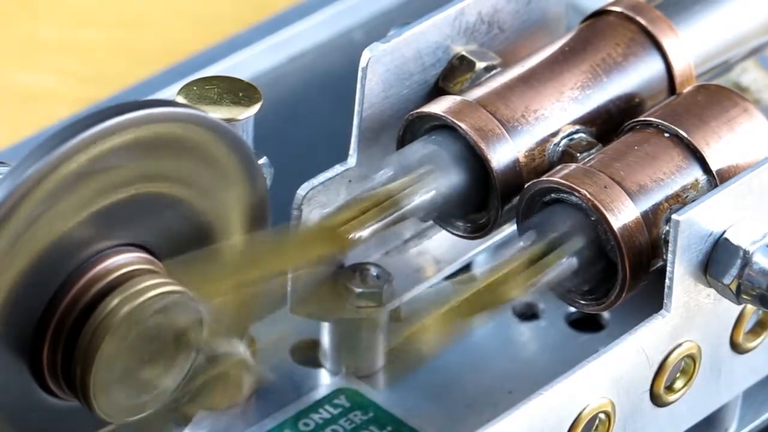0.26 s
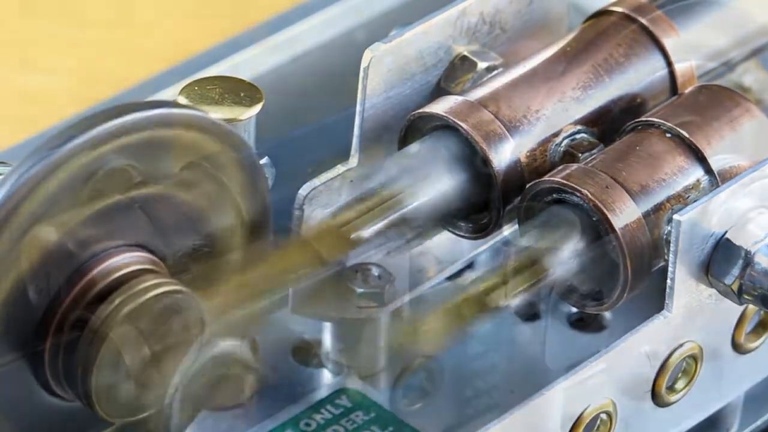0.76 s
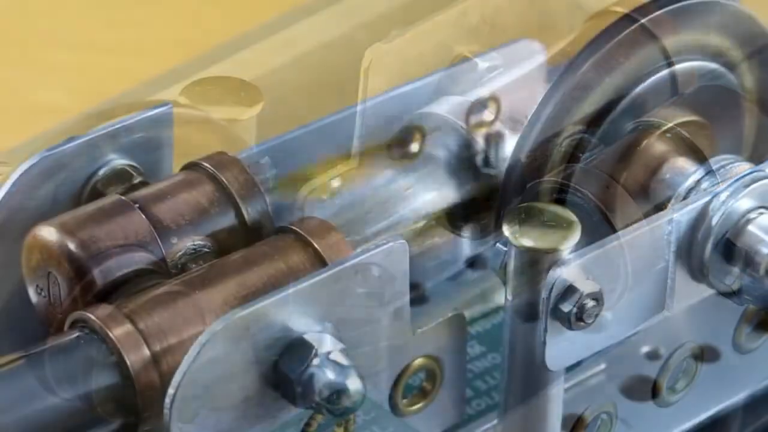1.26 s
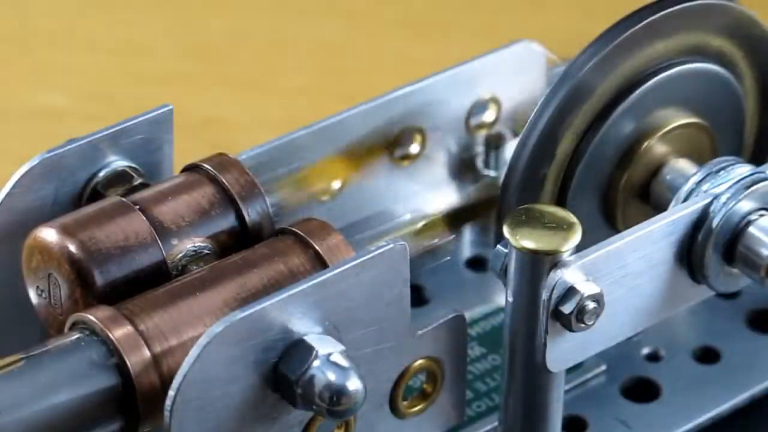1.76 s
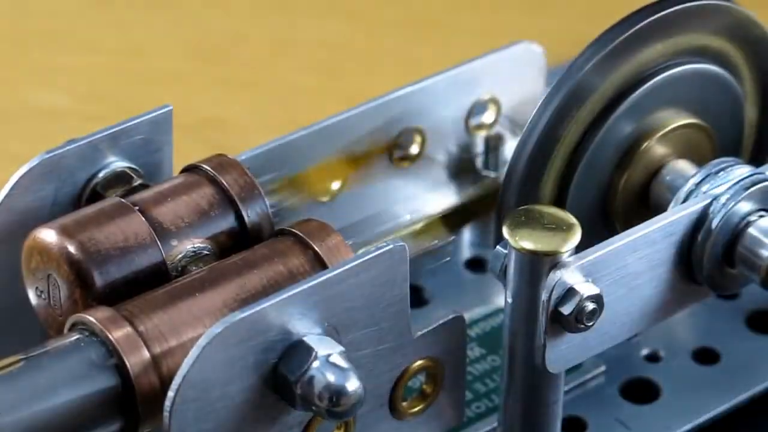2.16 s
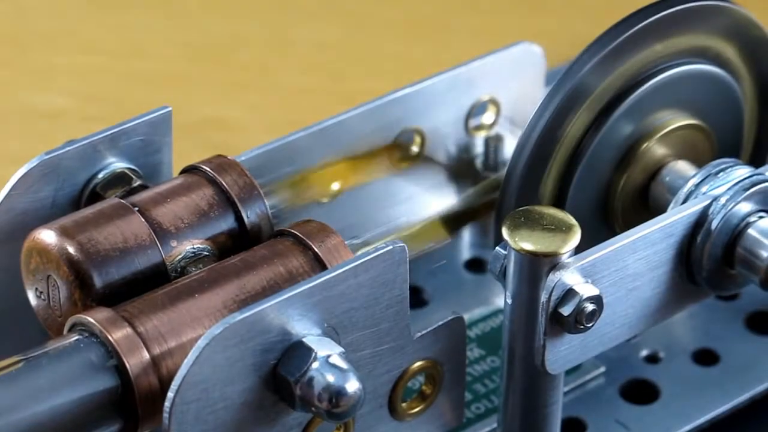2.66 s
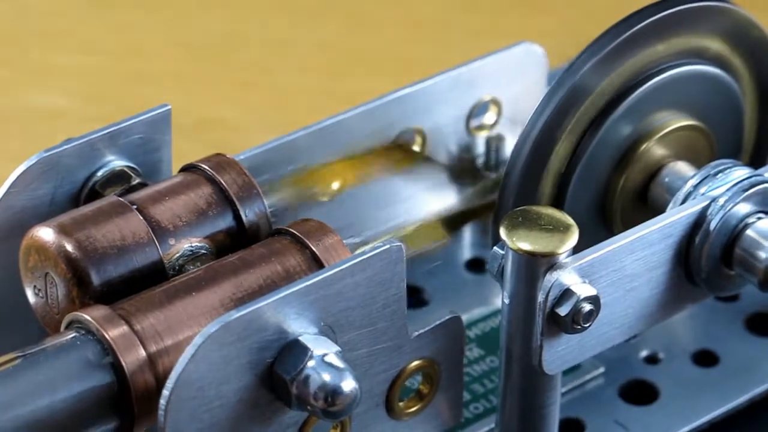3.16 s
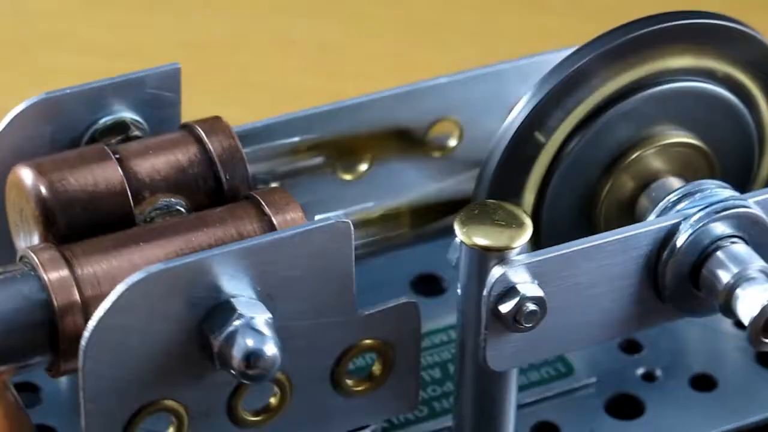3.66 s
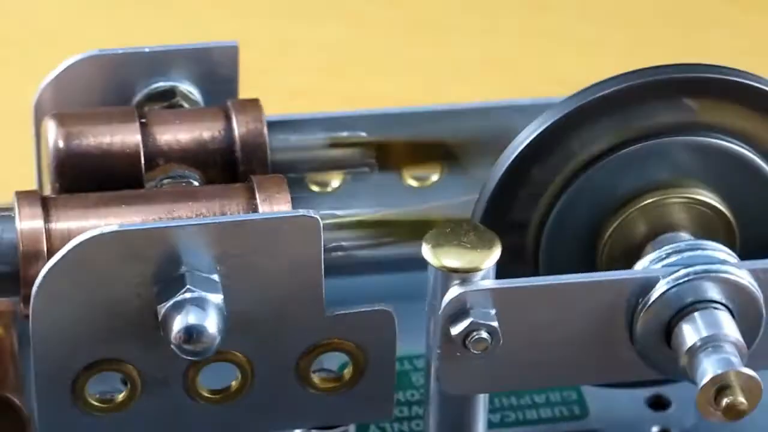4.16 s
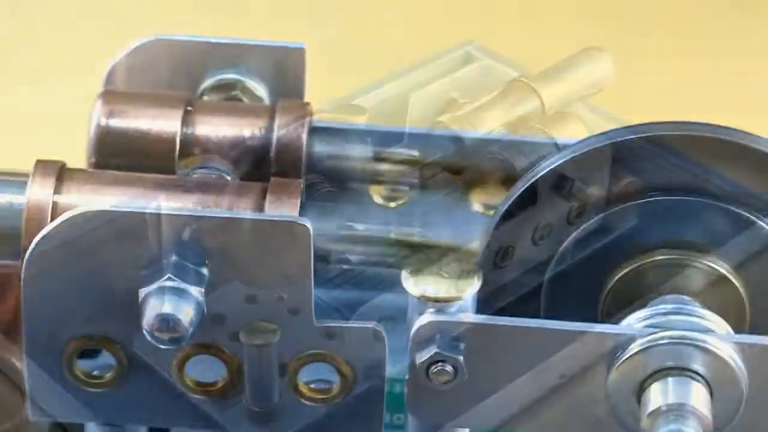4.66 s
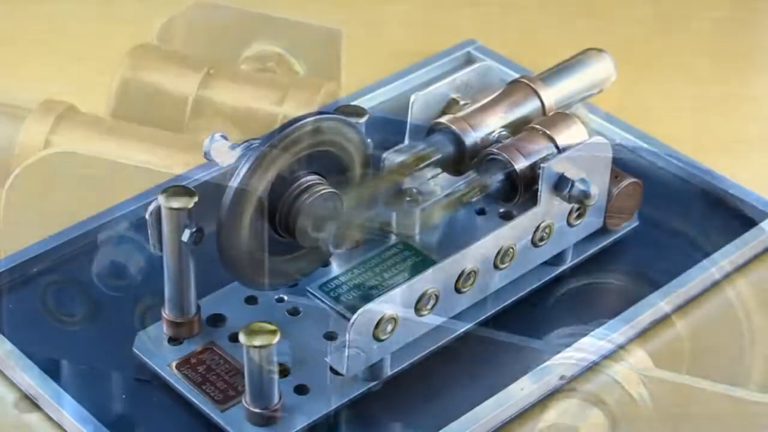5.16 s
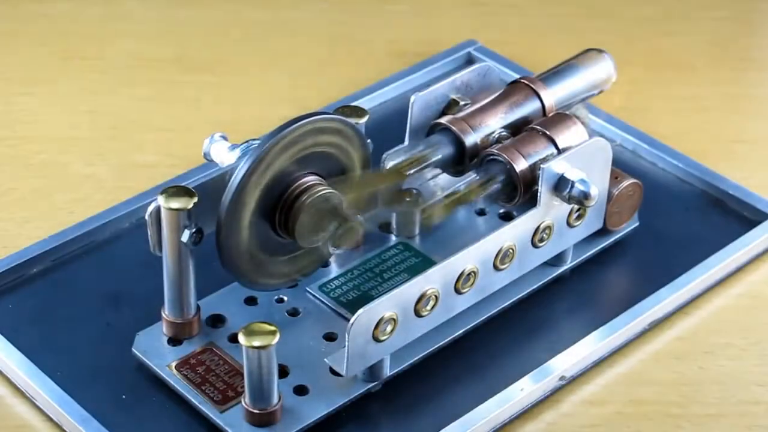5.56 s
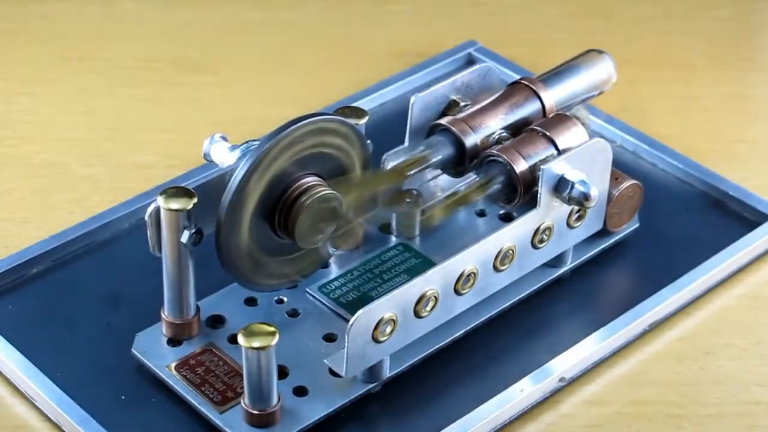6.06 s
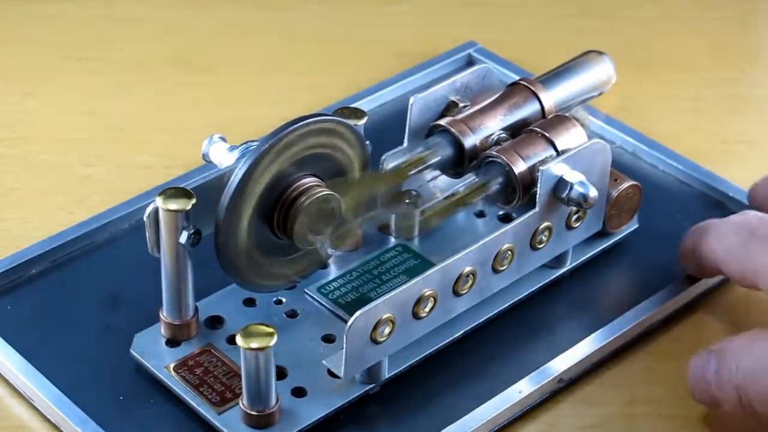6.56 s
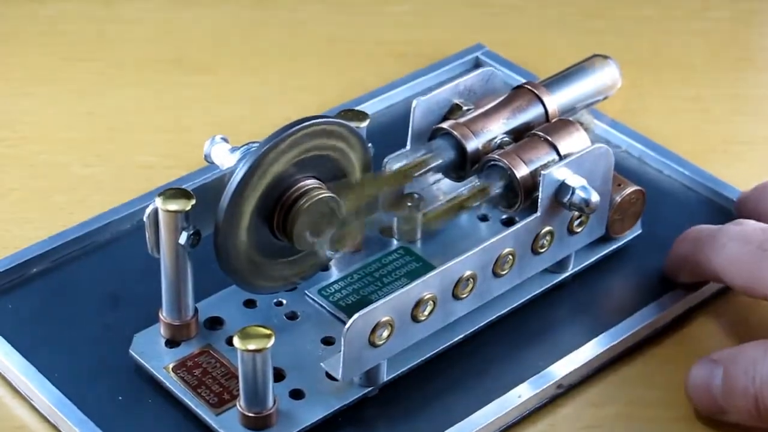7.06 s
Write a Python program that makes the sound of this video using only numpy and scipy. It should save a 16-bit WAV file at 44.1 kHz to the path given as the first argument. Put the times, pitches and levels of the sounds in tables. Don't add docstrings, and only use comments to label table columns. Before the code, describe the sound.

Close stereo sound of a tiny metal engine at steady high speed: rapid three-part clicking each turn, thin metal ringing, dry rubbing and a droning vibration through the table. Three joined stretches differ in pitch and tone: fast and tinny, slightly slower with a stronger hum, then fast and unsteady. Treble leans right, the left side duller. Faint room rumble; the engine never stops.

```python
import sys
import numpy as np
from scipy import signal
from scipy.fft import rfft, irfft, next_fast_len
from scipy.io import wavfile
from scipy.ndimage import uniform_filter1d

SR = 44100
rng = np.random.default_rng(int(sys.argv[2]) if len(sys.argv) > 2 else 0)


def digitize_waveform(pressure):
    field = np.atleast_2d(pressure).T
    bounded = np.clip(field, -1, 1)
    quanta = np.round(bounded * 32767).astype(np.int16)
    wavfile.write(sys.argv[1], SR, quanta)


def to_linear_factor(level_db):
    exponent = np.asarray(level_db, float) / 20
    return 10 ** exponent


N = 322812

LANDING = [
    [(1.5, 0.064, .02), (2.6, 0.048, -0.1615), (.5, .07, 0.012)],
    [(1.0, 0.12, .15), (1.5, 0.11, -0.1006), (1.5, 0.06, -0.0087)],
    [(2.2, 0.078, .06), (1.4, 0.071, -0.0785), (1, 0.1, .01)],
    [(0.9, 0.093, .2), (2.2, 0.084, 0.13), (.6, 0.057, -0.067)],
]


def unit(x):
    return x / np.sqrt(np.mean(x ** 2))


def ring(x, hz, width_hz):
    return signal.lfilter(*signal.iirpeak(hz, hz / width_hz, SR), x) * np.sqrt(SR / np.pi / width_hz)


def highpass(x, order, hz):
    return signal.sosfilt(signal.butter(order, hz, "high", fs=SR, output="sos"), x)


def walk(size, rate):
    spacing, step = int(SR / rate), 16
    points = rng.standard_normal(size // spacing + 2)
    levels = np.interp(np.arange(0, size, step) / spacing, np.arange(len(points)), points)
    return 0.45 * np.repeat(uniform_filter1d(levels, spacing // step), step)[:size]


def chatter(size):
    hits, count = np.zeros(size), int(size * 12000 / SR)
    force_db = rng.exponential(size=count)
    hits[rng.integers(size, size=count)] = rng.standard_normal(count) * to_linear_factor(force_db)
    return unit(hits)


def knock(turns, start, length, blow, rise):
    count = (turns - start + .1).astype(int)
    since = (turns - start - .007 * rng.standard_normal(200)[count]) % 1
    struck = np.diff(since > .08, prepend=True) & (since > .08)
    firm = 3 * uniform_filter1d(blow * struck, size=3)
    shape = (1 - np.exp(-(since / rise) ** 2)) * np.exp(-(since / length) ** 2)
    force_db = .8 * rng.standard_normal(200)[count]
    loose, repeat = chatter(len(turns)), 0.71
    worn = loose[(since / np.median(np.diff(turns))).astype(int)]
    return to_linear_factor(force_db) * (firm + shape * (np.sqrt(repeat) * worn + np.sqrt(1 - repeat) * loose))


def hard_knocks_db(t):
    # (t/s, peak level/dB)
    hard = np.array([(0.0478, -9), (0.0767, -10), (0.1062, -7), (0.3376, -9), (0.4249, -8), (0.5402, -5.5),
                     (0.598, -11.5), (0.6265, -10), (0.6559, -9), (0.6843, -13), (0.829, -9.5),
                     (0.9158, -5), (0.9742, -14), (1.003, -7), (1.0316, -10), (1.1478, -12), (1.2052, -10),
                     (1.2925, -18), (1.3498, -10), (1.4077, -6), (1.4656, -11), (1.5229, -15),
                     (2.2024, -12), (2.8396, -9), (7.1693, -4.5), (7.257, -8)])
    middling_db, length_s = 3.5, 0.0033
    extra_db = np.zeros(len(t))
    for s, db in hard:
        near = slice(*np.searchsorted(t, (s - 2 * length_s, s + 4 * length_s)))
        over_db = max(db - np.median(hard[:, 1]) + middling_db, 0)
        extra_db[near] += over_db * np.exp(-((t[near] - s) / length_s - 1) ** 2)
    return extra_db


def contacts(t, turns, place):
    knocks = [
        [(.96, .11), (.385, .095), (.6, .15)],
        [(.05, .26), (.54, .24), (.76, .2)],
        [(.05, .3), (.55, .2), (.76, .26)],
        [(.96, .16), (.42, .16), (.55, .13)],
    ][place]
    extra_db = hard_knocks_db(t)
    bursts = [to_linear_factor(extra_db) * knock(turns + 1, start, length, blow, rise)
              for (start, length), (blow, rise, _) in zip(knocks, LANDING[place])]
    dip, dip_turns = (0.35, 0.35, 0.5, 0.33)[place], 0.14
    ease = 1
    for start, _ in knocks[:2]:
        away = (turns - start + 0.53) % 1 - .5
        ease = ease * (1 - dip * np.exp(-(away / dip_turns) ** 2))
    return np.array(bursts + [ease * chatter(len(turns))])


def swell(t, hz):
    # (centre t/s, half length/s, f/Hz, level/dB)
    swells = [
        (4.25, 0.2, 1240, 3),
        (5.15, .45, 4270, 4.5),
        (6.14, .12, 4200, 4.5),
        (6.287, 0.11, 3620, 5),
    ]
    return to_linear_factor(sum(db * np.exp(-((t - s) / half) ** 2)
                   for s, half, near_hz, db in swells if abs(hz / near_hz - 1) < .06))


def frame_ring(t, turns, place, cylinders):
    # (f/Hz, width/Hz, level/dB in knock 1, knock 2, knock 3, steady rub)
    frame_near = [(1273, 56, -47, -46, -38, -37), (2105, 48, -34, -62, -61, -38.5),
                  (2460, 440, -47, -64.5, -49.0, -35.5), (3390, 250, -53, -20, -43, -34.5),
                  (3908, 350, -39, -15, -36, -33.5), (4810, 410, -11.5, -21, -31, -47),
                  (5260, 450, -25, -45, -50, -28), (5580, 150, -30, -28, -50, -58),
                  (6070, 370, -37, -53, -42, -35), (6920, 470, -18, -23, -37, -25.5),
                  (7290, 75, -17, -32, -47.5, -26), (7940, 190, -18, -15.5, -38, -38),
                  (8590, 420, -12, -44, -27, -28), (9320, 110, -16.5, -19, -47, -44)]
    frame_side = [(1240, 110, -50, -33, -35, -37), (2070, 53, -56, -71, -55.3, -39),
                  (2474, 100, -34, -27.5, -52, -30.5), (2720, 55, -62, -23, -56.5, -47),
                  (3286, 210, -63, -19, -55, -31.5), (3825, 87, -51, -32.5, -38, -41),
                  (4184, 86, -39, -20, -57, -32.5), (4983, 540, -17, -25.5, -45, -27),
                  (5920, 390, -43, -33, -50.8, -41), (6380, 500, -38.5, -52, -27, -28.5),
                  (6750, 77, -19, -45.5, -46, -29.5), (7430, 300, -17, -15, -15, -23.5),
                  (8180, 190, -17.5, -44, -13, -30), (9540, 350, -19, -36, -30, -33)]
    frame_back = [(1239, 32, -50, -57, -33, -34.5), (2013, 86, -30.5, -50, -44, -36.5),
                  (2458, 81, -38, -26.5, -41, -32.5), (2720, 120, -54, -23, -50, -35),
                  (3276, 180, -38, -22, -54.5, -26.5), (3460, 210, -53, -22, -53, -33),
                  (4274, 130, -24, -20.5, -71, -30.5), (5190, 250, -27, -24, -47, -27.5),
                  (5890, 120, -46, -32, -38, -40), (7140, 610, -18, -42, -17, -24),
                  (7400, 280, -15.5, -45, -15.5, -23.5), (8250, 360, -18, -20, -34, -30),
                  (8120, 200, -28, -50.6, -23, -31), (9454, 400, -15, -31, -20.5, -33)]
    frame_far = [(1309, 63, -59, -43, -46, -38), (1760, 44, -31.5, -55, -56, -47.5),
                 (2063, 55, -35, -50, -69, -42.5), (2710, 340, -66, -61, -57, -39),
                 (3630, 120, -48, -23, -25, -36.5), (4236, 540, -18.5, -21.5, -23, -38),
                 (4580, 52, -26, -25, -46, -36), (5050, 300, -21, -34, -36, -37.5),
                 (5590, 69, -39, -30.5, -43.9, -58), (6330, 83, -17, -48.3, -48.3, -34),
                 (7280, 280, -20, -44, -25, -23.5), (8140, 770, -12.5, -55, -33, -69),
                 (8250, 220, -35, -24, -20, -30), (9430, 430, -17.5, -24.5, -41, -34.5)]
    frame = (frame_near, frame_side, frame_back, frame_far)[place]
    samples_per_turn = SR * (t[-1] - t[0]) / (turns[-1] - turns[0])
    glide = [row[2] * samples_per_turn for row in LANDING[place]] + [0]
    stiff_hz = 2730
    lower, upper = np.zeros(len(t)), np.zeros(len(t))
    for k, (hz, width_hz, *share_db) in enumerate(frame):
        wander_db = 0.5 * rng.standard_normal(200) + 1.2 * uniform_filter1d(rng.standard_normal(200), size=4)
        octaves = np.log2(np.clip(hz, 3000, 5300) / 4200) * (hz < 1.1 * 5300)
        drive = sum(to_linear_factor(db) * np.roll(c, int(g * octaves))
                    for db, c, g in zip(share_db, cylinders[k % 2], glide))
        drive = drive * to_linear_factor(wander_db)[turns.astype(int)] * swell(t, hz)
        group = upper if hz > stiff_hz else lower
        group += (-1) ** (k // 2) * ring(drive, hz, width_hz)
    return lower + highpass(upper, 3, stiff_hz)


def plate_ring(t, turns, place):
    # (f/Hz, width/Hz, level/dB)
    plate = [
        [(730, 50, -53), (1099, 70, -46.5), (1237, 44, -35), (1817, 34, -45.5)],
        [(780, 230, -48), (1069, 82, -41.5), (1413, 210, -44.5), (1417, 41, -41.5)],
        [(717, 68, -43.5), (980, 150, -43), (1258, 39, -40.5), (1456, 65, -47)],
        [(687, 31, -50), (1027, 330, -45.5), (1338, 72, -40), (1880, 20, -52)],
    ][place]
    # (first [turns], second [turns], second against first level/dB)
    thumps = [
        (0.1221, 0.4, -3),
        (0.21, 0.7, -5),
        (.21, .55, -11.5),
        (0.32, 0.82, -5),
    ][place]
    beat = turns + .0012 * walk(len(turns), rate=30)
    first, second = (np.diff(np.floor(beat - angle), prepend=0) > 0 for angle in thumps[:2])
    force_db = 1.5 * rng.standard_normal(200)[turns.astype(int)]
    thump = unit((first + to_linear_factor(thumps[2]) * second) * to_linear_factor(force_db))
    out = 0
    for k, (hz, width_hz, db) in enumerate(plate):
        soft = signal.lfilter(*signal.iirpeak(hz, hz / 170, SR), thump)
        out = out + (-1) ** k * to_linear_factor(db + 1.0) * swell(t, hz) * ring(soft, hz, width_hz)
    return out


def clatter(t, turns, place):
    cylinders = (contacts(t, turns, place), contacts(t, turns, place))
    tick = ring(ring(to_linear_factor([-19, -43, -39, -28]) @ cylinders[0], 6300, 7400), 6300, 8500)
    edge = highpass(to_linear_factor([-28, -37, -30, -41]) @ cylinders[1], 2, 9000)
    return unit(frame_ring(t, turns, place, cylinders) + tick + edge + plate_ring(t, turns, place))


def crank_harmonics(turns, place, lag, thrum_db, ring_db):
    # (multiple of crank speed, level/dB)
    hum_near = [(1, -32.5), (2, -42), (3, -31.5), (4, -37), (5, -42.5), (6, -47), (7, -38), (8, -51),
                (9, -35), (10, -26), (11, -56), (12, -76), (13, -39), (14, -45), (15, -34.5), (16, -38.5),
                (17, -32), (18, -43), (19, -51), (20, -48)]
    hum_side = [(1, -41), (2, -47), (3, -40.5), (4, -26.5), (5, -48), (6, -29.5), (7, -39), (8, -44.5),
                (9, -42.5), (10, -46), (11, -32), (12, -71), (13, -65), (14, -47), (15, -45), (16, -51),
                (17, -44), (18, -50.5), (19, -45.5), (20, -57.5)]
    hum_back = [(1, -49), (2, -56), (3, -61), (4, -33), (5, -65), (6, -35), (7, -39), (8, -47), (9, -47),
                (10, -46), (11, -34), (12, -68), (13, -75), (14, -47), (15, -72), (16, -53), (17, -50.5),
                (18, -57), (19, -54), (20, -54)]
    hum_far = [(1, -40.5), (2, -50), (3, -40.5), (4, -34.5), (5, -37.5), (6, -43.5), (7, -47), (8, -48),
               (9, -59), (10, -42), (11, -56), (12, -62), (13, -45), (14, -92), (15, -43), (16, -41.5),
               (17, -42.5), (18, -80), (19, -50.5), (20, -53)]
    out = 0
    for k, db in (hum_near, hum_side, hum_back, hum_far)[place]:
        waver = 0.03 * np.sqrt(k) * walk(len(turns), rate=5.5)
        db = db + 0.29 * walk(len(turns), rate=5.1) + thrum_db * (k in (2, 3)) + ring_db * (k in (10, 11))
        out = out + np.sqrt(2) * to_linear_factor(db) * np.sin(2 * np.pi * (k * turns + lag * k ** 2) + waver)
    return out


def overtones(turns, place):
    level_db = (-52.5, -53.5, -57.5, -53.5)[place]
    angle, out = turns + .002 * walk(len(turns), rate=5), 0
    for k in range(21, 37):
        strength = to_linear_factor(level_db + 1.5 * rng.standard_normal())
        out = out + strength * np.sin(2 * np.pi * (k * angle + rng.random()))
    return out


def table_shake(turns, place, thrum_db):
    # (f/Hz, width/Hz, level/dB)
    table_modes = [
        [(117, 47, -36), (266, 88, -42.5), (324, 66, -35), (474, 75, -39), (587, 66, -42), (817, 410, -43.5)],
        [(114, 21, -38), (204, 120, -39.5), (350, 75, -38), (477, 55, -57), (585, 77, -42.5),
         (1020, 600, -43.5)],
        [(113, 53, -38.5), (205, 45, -56), (335, 72, -41), (475, 140, -51.5), (583, 71, -49),
         (1050, 670, -45.5)],
        [(130, 16, -40), (209, 50, -41), (345, 46, -38), (498, 32, -48), (569, 75, -41), (1030, 240, -45)],
    ][place]
    shake = 1 + 0.12 * np.cos(4 * np.pi * turns)
    out = 0
    for hz, width_hz, db in table_modes:
        mode = ring(ring(shake * rng.standard_normal(len(turns)), hz, width_hz), hz, 1.65 * width_hz)
        mode = unit(highpass(mode, 4, 92))
        out = out + to_linear_factor(db + thrum_db * (hz < 150)) * mode
    return out


def hum(turns, place, lag, thrum_db, ring_db):
    harmonics = crank_harmonics(turns, place, lag, thrum_db, ring_db)
    return unit(harmonics + table_shake(turns, place, thrum_db) + overtones(turns, place))


def rumble(size):
    return to_linear_factor(-65) * ring(rng.standard_normal(size), 55, 40)


def stretch(speed, start_turns, loud, tray, places):
    speed, loud = np.array(speed), np.array(loud)
    t = np.arange(round(speed[0, 0] * SR), min(round(speed[-1, 0] * SR), N)) / SR
    crank = start_turns + np.cumsum(np.interp(t, *speed.T)) / SR
    crank = crank + .746 * (t > 2.345) * (t[0] < 2.345)
    lowest_db, tray_db, unsteady_db, lag = tray
    thrum_db = lowest_db - 7 * np.clip((t - 7.0) / .1, 0, 1)
    ring_db = tray_db + unsteady_db * walk(len(t), rate=4.5)
    hum_db, clatter_db = (np.interp(t, loud[:, 0], c) for c in loud.T[1:])
    lift_s = (3.15, 3.36)
    walk_s = (3.043, 4.065)
    out = np.zeros(len(t))
    for k, place in enumerate(places):
        low, high = (np.abs(1 - k - np.interp(t, span, (0, 1)) * (len(places) - 1)) for span in (lift_s, walk_s))
        on = low > 0
        out[on] += (low * to_linear_factor(hum_db - 2))[on] * hum(crank[on], place, lag, thrum_db[on], ring_db[on])
        on = high > 0
        out[on] += (np.sqrt(high) * to_linear_factor(clatter_db + 1))[on] * clatter(t[on], crank[on], place)
    return out + rumble(len(t))


def engine():
    # (t/s, speed [turns a second])
    speeds = [
        [(0, 34.58), (1.543, 34.58)],
        [(1.543, 31.69), (2.345, 31.69), (2.346, 31.78), (2.7, 31.78), (3.1, 31.98), (3.7, 31.73),
         (5.427, 31.73)],
        [(5.427, 33.97), (7.32, 33.81)],
    ]
    # (t/s, hum level/dB, clatter level/dB)
    loudness = [
        [(0, -30, -23), (.25, -30, -23), (1.1, -30, -23.5), (1.54, -29, -21.5)],
        [(1.55, -26.5, -24.5), (1.8, -24.5, -23), (2.7, -24, -23), (3.2, -25, -23.5), (3.75, -27.5, -24),
         (4.25, -25.5, -23), (4.75, -27.5, -24.5), (5.15, -27, -25), (5.42, -25.5, -24)],
        [(5.43, -28, -23.5), (5.9, -28.5, -23.5), (6.25, -28.5, -23), (6.7, -29.5, -23.5), (7.32, -29.5, -23.5)],
    ]
    # (lowest thrum level/dB, tray ring level/dB, ring unsteadiness/dB,
    # lag of harmonics [cycles per multiple squared])
    trays = [
        (.8, -6, 3, .043),
        (1.4, 3, 0.8, -.055),
        (3.6, 0, 6, .09),
    ]
    start_turns, places = (.333, .292, .012), ([0], [1, 2], [3])
    return np.concatenate([stretch(*row) for row in zip(speeds, start_turns, loudness, trays, places)])


def camera_ports(sound):
    # (f/Hz, level/dB)
    right_port = np.array([(30, 2), (8500, 2), (10000, 5.5), (11000, 3), (13000, -5.5), (15700, -4),
                           (15900, -60)])
    # (f/Hz, level/dB, phase [radians], scattered over direct level/dB)
    left_port = np.array([(30, -1.8, 0, -30), (60, 0, 0, -23), (300, 0, 0, -27), (600, .1, 0, -14),
                          (1200, 0, -.12, -12), (2200, 1.4, -.25, -7.5), (3400, -.8, -.8, -3),
                          (5000, 4.4, -1, 1), (6000, .5, -2.1, 4), (7300, -13.5, -2.2, .5),
                          (8300, -21, -1.7, -.5), (10000, -17.5, -1.2, 1.5), (13000, -16, -1, 12),
                          (16000, -17, -1.5, 15)])
    size = next_fast_len(N + 8192)
    log_hz = np.log(np.maximum(np.arange(size // 2 + 1) * SR / size, 1))
    right = rfft(sound, size) * to_linear_factor(np.interp(log_hz, np.log(right_port[:, 0]), right_port[:, 1]))
    gain_db, phase, scatter_db = (np.interp(log_hz, np.log(left_port[:, 0]), c) for c in left_port.T[1:])
    age, wall_s = np.arange(8192) / SR, .03
    echo = rng.standard_normal(8192) * np.exp(-(age % wall_s) / .0015 - age / .05) * (age > wall_s)
    scatter = rfft(echo / np.sqrt(np.sum(echo ** 2)), size) * to_linear_factor(scatter_db)
    left = right * to_linear_factor(gain_db) * (np.exp(1j * phase) + scatter) / np.sqrt(1 + to_linear_factor(2 * scatter_db))
    return np.array([irfft(left, size)[:N], irfft(right, size)[:N]])


def scene():
    return camera_ports(engine())


def top_cut(x):
    return signal.sosfilt(signal.butter(12, 15830, fs=SR, output="sos"), x)


def record(dry):
    return top_cut(np.tanh(dry))


dry = scene()
out = record(dry)
digitize_waveform(out)
```